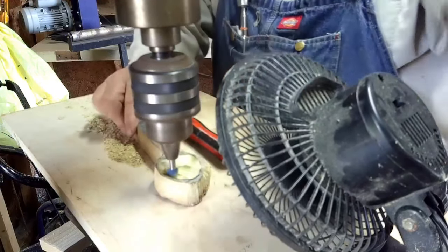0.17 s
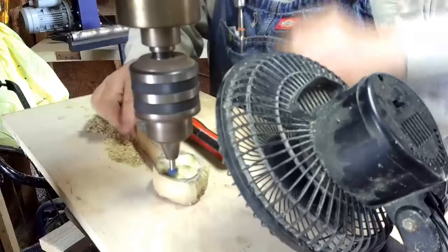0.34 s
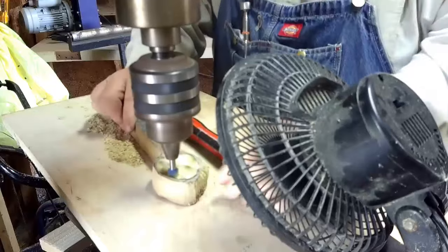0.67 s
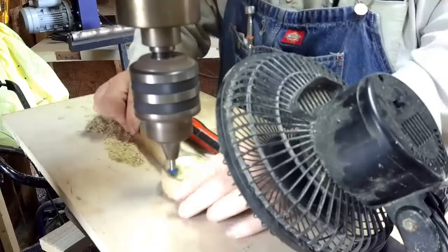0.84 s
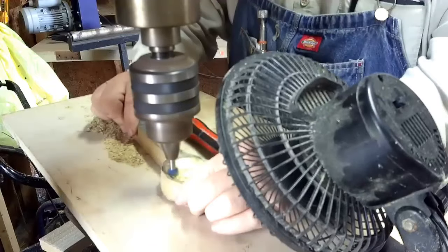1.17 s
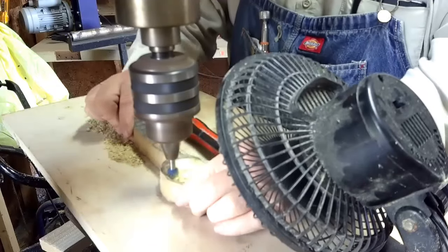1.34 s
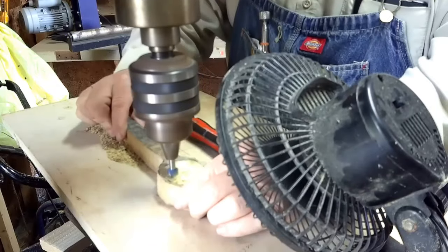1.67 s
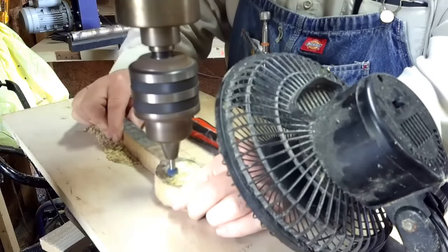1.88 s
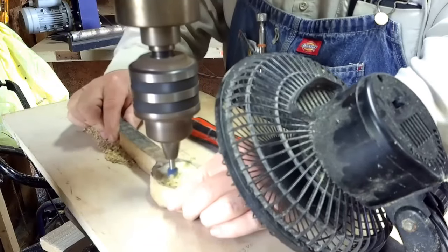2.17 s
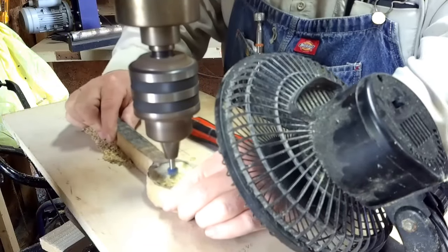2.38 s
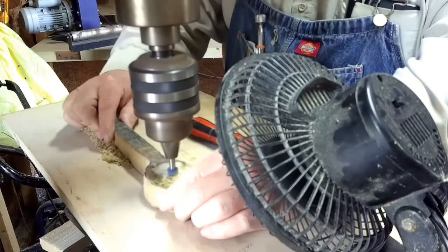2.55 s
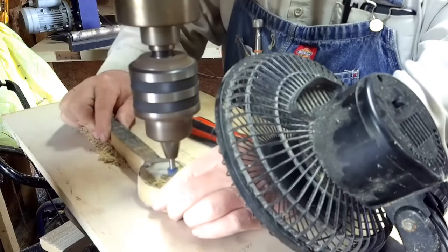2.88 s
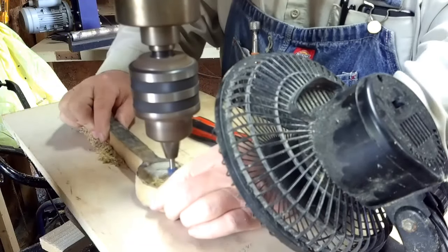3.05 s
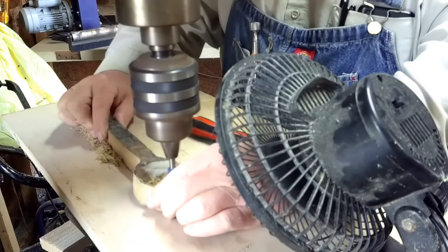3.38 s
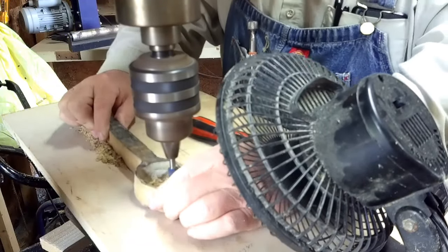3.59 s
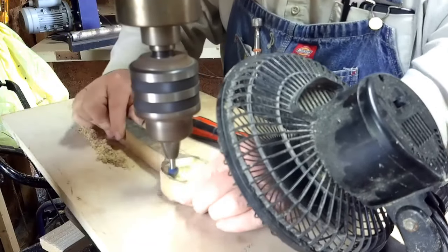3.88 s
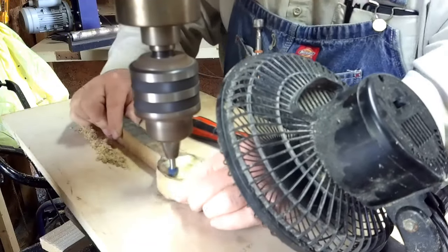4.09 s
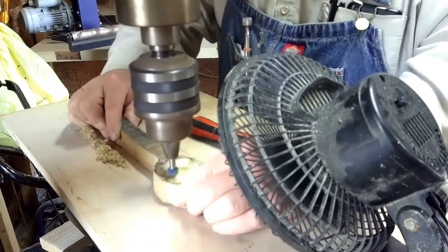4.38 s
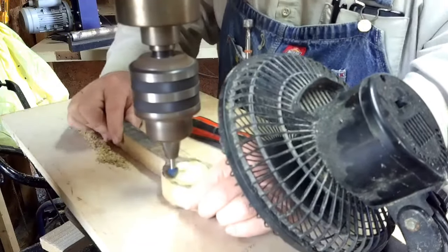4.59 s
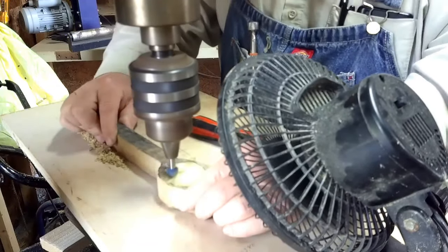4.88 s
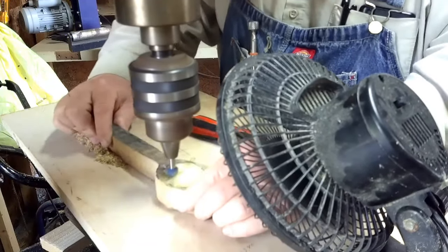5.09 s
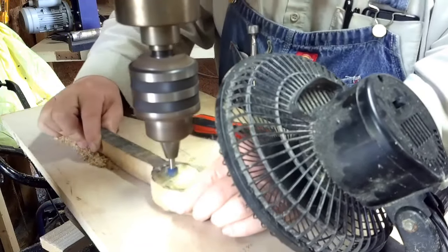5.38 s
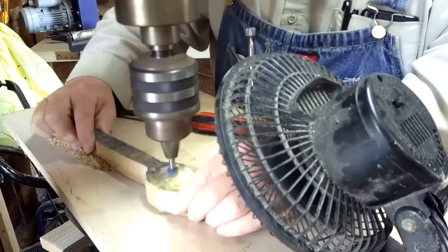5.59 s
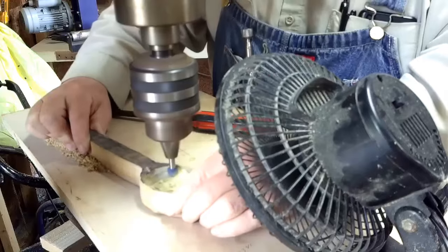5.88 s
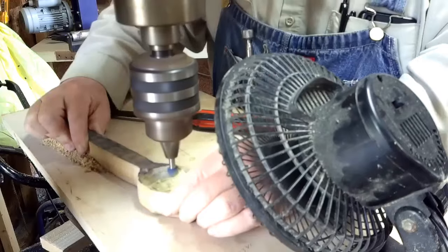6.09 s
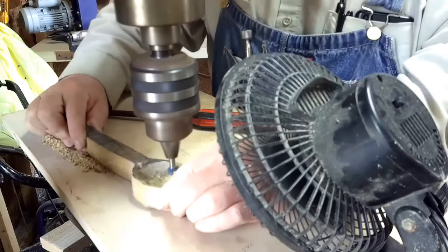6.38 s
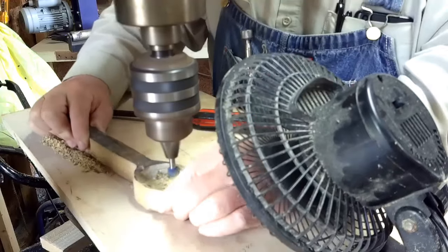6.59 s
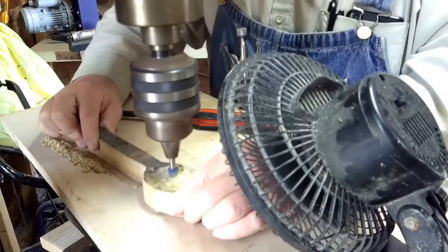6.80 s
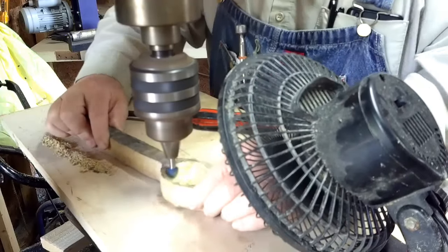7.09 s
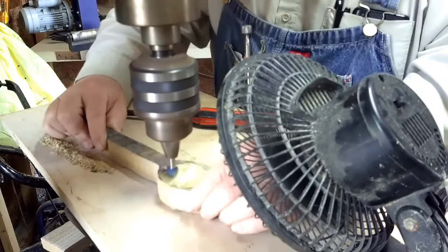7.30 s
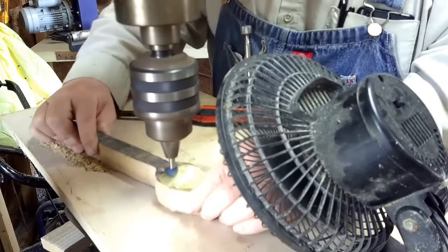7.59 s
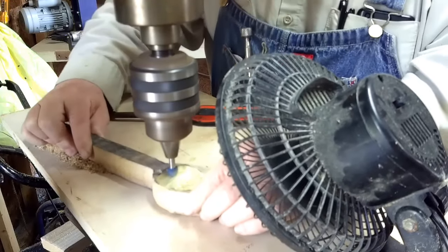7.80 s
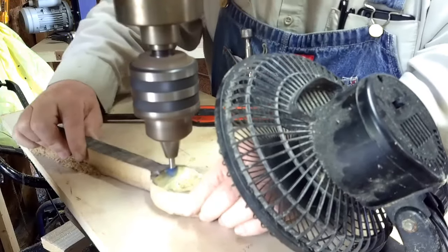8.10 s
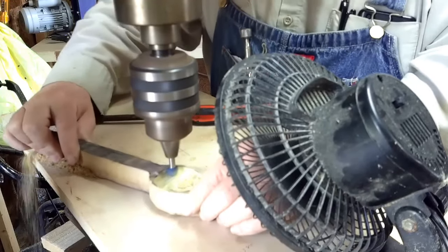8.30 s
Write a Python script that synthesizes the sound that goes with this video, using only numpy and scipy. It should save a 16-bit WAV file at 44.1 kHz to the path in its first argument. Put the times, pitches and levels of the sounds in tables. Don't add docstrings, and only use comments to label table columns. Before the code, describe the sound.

A spinning carving burr first touches wood lightly, then pushes in with a loud, clipped grinding roar, sharp bright snags and a buzzing mains hum. A tiny gap cuts it off. A pop starts a much faster version: thin motor whine, gritty treble hiss, singing wood, thin squeals and tearing puffs coming and going. Dry, close workshop pickup, slightly grainy treble, ending while still running.

```python
import sys
import numpy as np
from scipy import signal
from scipy.fft import rfft, irfft, next_fast_len
from scipy.io import wavfile
from scipy.ndimage import uniform_filter1d

SR = 44100
rng = np.random.default_rng(int(sys.argv[2]) if len(sys.argv) > 2 else 0)


def gain_from_db(level_db):
    decades = np.asarray(level_db, float) / 20
    return 10 ** decades


def pcm_store(signal):
    levels = np.round(np.clip(np.atleast_2d(signal), -1, 1) * 32767)
    wavfile.write(sys.argv[1], SR, levels.astype(np.int16).T)


N = 372644
T = np.arange(N) / SR

SLOW_END_S, FAST_START_S = 0.8016, 0.8216
MAINS_HZ = 120
SPINDLE_HZ, LOADED_HZ = 197.5, 197.4
SQUEAL_REST_DB = -42.5

# t/s, depth of bite/dB, shake of the table/dB
FEED_SLOW = [
    (0.0, -48, -14.5),
    (0.11, -20, -12),
    (0.15, -29, -14.5),
    (0.28, -28, -14),
    (0.355, -14.5, -10.5),
    (0.51, -9, -8),
    (0.65, -15, -13),
    (0.78, -14, -8.5),
    (0.8, -19, -10),
]
# t/s, peak level/dB, ring f/Hz
SNAGS = [
    (0.052, -5, 4760),
    (0.102, -10, 3440),
    (0.192, -9, 3390),
    (0.3082, -15, 2650),
    (0.4494, -2, 2800),
    (0.4958, 7.5, 4500),
    (0.574, -7, 4500),
    (0.626, 2.5, 3600),
    (0.74, -4, 3340),
]
# t/s, peak level/dB
TICKS = [(0.0513, -37), (0.0812, -30), (0.1027, -28), (0.1945, -32), (0.2628, -25), (0.3112, -30),
         (0.3681, -19), (0.397, -23), (0.4484, -15), (0.4958, -11), (0.7018, -22), (0.7397, -23)]
# f/Hz, level/dB per Hz
DUST = [(880, -32), (1500, -19), (2490, -8.5), (3480, -4.5), (4120, -9.5), (4590, -1), (6240, -17),
        (8240, -23), (10000, -40), (16000, -48)]
# f/Hz, width/Hz, level/dB
BITE = [(2160, 140, -3), (2750, 36, 6.5), (3557, 63, 4.5), (4420, 110, -4.5)]
# order, level/dB
HUM = [(1, -33), (4, -33), (5, -33), (6, -30)]
# start t/s, end t/s, order, level/dB
DRONES = [
    (-.04, .06, 2, -22.5),
    (.05, .14, 2, -12.5),
    (.16, .29, 2, -13),
    (.3, .46, 2, -18),
    (.07, .19, 3, -18.5),
    (.2, .3, 3, -12.5),
    (.34, .45, 3, -18.5),
    (.57, .63, 3, -18),
    (.74, .81, 3, -14.5),
]
# order, level/dB
DRONE_REST = [(2, -28), (3, -27)]
# f/Hz, level/dB per Hz
RUMBLE = [(18, -81), (60, -52), (110, -33), (200, -21), (260, -13), (400, -8), (660, -9.5), (900, -8),
          (1150, -9), (1900, -17), (3400, -16), (5000, -19), (6200, -30), (13000, -100)]
# f/Hz, width/Hz, level/dB
CASTING = [(268.6, 25, 7), (452, 76, -2), (610, 39, -5), (755, 40, -1), (860, 70, 0), (890, 56, 1),
           (966, 69, -1.5), (1204, 50, -7), (1304, 35, -8), (1690, 44, -2)]

# t/s, feed pressure/dB, fine dust/dB
FEED = [(0.82, -25, -27), (1.3, -24, -21.5), (2.0, -24.5, -26.5), (2.32, -26.5, -21.5), (2.7, -27.5, -22),
        (3.45, -25.5, -21.5), (3.52, -30.5, -22.5), (4.41, -31, -23), (4.47, -25.5, -22), (5.25, -27, -24),
        (5.9, -25, -21.5), (6.32, -29, -22), (6.37, -26.5, -23), (7.0, -30, -23.5), (7.05, -26, -29),
        (7.3, -27.5, -24), (7.9, -30, -27), (8.45, -28.5, -26)]
# f/Hz, level/dB per Hz
CHIPS = [(2350, -12), (4000, -2.5), (4740, 1), (5160, -2.5), (8000, -3), (11000, 7), (13100, 5),
         (13700, -1), (15800, 1)]
# t/s, peak level/dB, centre f/Hz, length/s
DIGS = [(1.924, -10, 5730, 0.0099), (3.309, -11, 5910, 0.018), (3.428, -14, 7400, 0.019),
        (3.718, -9.5, 8000, 0.05), (3.85, -12, 7660, 0.031), (3.915, -2.5, 9400, 0.0094),
        (4.111, -14, 9800, 0.023), (4.386, -17, 5760, 0.021), (4.447, -7.5, 7540, 0.014),
        (6.03, -12, 9060, 0.015), (6.395, -5.5, 5500, 0.025), (6.483, -7.5, 7600, 0.015),
        (6.866, -7.5, 8220, 0.027), (7.028, -10.5, 8930, 0.037)]
# start t/s, end t/s, f/Hz,
# width/Hz, level/dB
SINGING = [(0.816, .87, 10400, 6700, -20.5), (6.203, 6.29, 5090, 25, -40), (3.316, 3.34, 8000, 900, -24),
           (1.0, 1.88, 5800, 40, -40), (1.847, 2.18, 6000, 170, -37), (1.65, 2.15, 1152, 15, -40),
           (1.806, 2.176, 758, 13, -39.5), (1.679, 2.17, 1943, 63, -29.5), (3.13, 3.2, 5490, 60, -33),
           (3.138, 3.3, 6675, 40, -32), (3.2, 3.28, 5900, 40, -34), (3.36, 3.5, 7500, 560, -27.5),
           (3.5, 4.35, 9194, 20, -44), (4.606, 5.0, 4850, 29, -42), (4.715, 5.3, 745, 19, -52),
           (7.2, 7.5, 745, 19, -48), (3.352, 3.5, 7070, 40, -34), (3.36, 3.46, 6600, 40, -29),
           (3.39, 3.5, 7900, 60, -32), (3.29, 3.39, 5900, 30, -33), (5.112, 5.5, 1910, 63, -31.5),
           (5.443, 6.023, 6250, 47, -37), (5.97, 6.0, 9500, 1500, -24), (6.025, 6.05, 10500, 1800, -23),
           (6.09, 6.16, 10000, 1700, -25), (6.196, 6.29, 5490, 32, -31), (6.2, 6.28, 5885, 50, -31),
           (6.498, 6.576, 7500, 550, -26.5), (7.015, 7.122, 1950, 81, -27), (7.15, 7.382, 8500, 200, -35),
           (7.98, 8.5, 2780, 52, -29)]
# start t/s, end t/s, mode, level/dB
SQUEALS = [
    (.9, 2.8, 1, -58),
    (2.9, 3.6, 1, -31),
    (4.35, 4.9, 1, -48),
    (5.2, 5.7, 1, -36),
    (5.55, 6.5, 1, -31),
]
# f/Hz, level/dB per Hz
MACHINE = [(18, -54), (330, -32.5), (520, -22.5), (670, -27), (760, -16.5), (830, -25), (945, -19),
           (1720, -13.5), (2490, -11.5), (3320, -5), (4090, -13), (6720, -26), (10200, -16.5),
           (15500, -17.5)]
# f/Hz, width/Hz, level/dB
RESONANCES = [(904, 45, -1.5), (1050, 87, 3), (1375, 73, 5.5), (1555, 270, -5), (1722, 38, 3.5), (1946, 160, -4),
              (2326, 180, -6), (2694, 73, -1), (2780, 65, -1), (2940, 44, -12), (3230, 310, -6), (3435, 27, -5),
              (3694, 150, -5), (4750, 170, -2),
              (5490, 100, 0), (5900, 58, 4.5), (6410, 74, 4.5), (6670, 50, 3), (9860, 92, -0.5),
         (10300, 170, -1.5), (12800, 150, -4)]
# order, level/dB
SPINDLE = [(8, -41), (11, -45), (14, -45), (20, -46)]
# start t/s, end t/s, order, level/dB
LEANS = [(0.95, 1.72, 2, -49), (4.45, 4.68, 2, -50), (5.2, 5.8, 2, -54.5), (5.8, 6.22, 2, -49.5),
         (7.3, 8.6, 2, -51.5), (.8, 1.65, 4, -46), (1.9, 3.1, 4, -47), (2.65, 3.5, 4, -45),
         (4.45, 5.0, 4, -43), (5.55, 6.27, 4, -43), (6.3, 7.4, 4, -45), (7.9, 8.6, 4, -52),
         (1.6, 2.1, 6, -43), (6.3, 6.9, 6, -48), (7.1, 6.9, 4, -53), (3.2, 3.4, 4, -50), (3.2, 3.7, 2, -55),
         (6.75, 7.2, 2, -55), (2.4, 3.35, 6, -42), (3.44, 3.65, 6, -33), (5.3, 6.25, 6, -43),
         (6.9, 7.2, 6, -42), (7.25, 7.75, 6, -37.5),
         (1.25, 1.5, 7, -35), (.85, 1.25, 7, -35.5), (1.55, 2.25, 7, -30.5), (2.2, 2.75, 7, -26.5),
           (2.696, 3.39, 7, -29.5), (3.4, 3.9, 7, -35.5), (4.55, 4.95, 7, -29), (4.898, 6.25, 7, -32),
           (6.8, 6.94, 7, -26.5), (7.002, 7.264, 7, -27), (7.218, 8.094, 7, -35.5), (1.7, 2.12, 10, -33.5),
           (2.1, 3.4, 10, -40), (4.65, 4.9, 10, -37), (5.12, 6.2, 10, -40), (6.996, 7.22, 10, -29),
           (7.296, 7.6, 10, -35), (7.5, 8.6, 10, -30.5), (1.92, 2.3, 12, -33), (2.3, 2.75, 12, -35.5),
           (4.65, 4.88, 12, -36), (5.85, 6.15, 12, -37), (7.75, 8.6, 12, -38), (1.3, 1.5, 24, -36),
           (2.0, 2.7, 24, -42), (6.7, 6.95, 24, -40), (4.62, 5.0, 24, -31), (7.3, 7.8, 24, -39)]
# order, level/dB
LEAN_REST = [(2, -60.5), (4, -59), (6, -45), (7, -46), (10, -51), (12, -43), (24, -53)]
# t/s, rotor whine f/Hz
ROTOR = [(.82, 868.4), (1.75, 867.1), (4.25, 868.8), (4.9, 868), (6.0, 867.8), (6.55, 868.8), (7.8, 867.5),
         (8.45, 867.6)]
# multiple, offset/Hz, level/dB
ROTOR_LINES = [(1, 0, -34.5), (1, 3.5, -43), (1, 13, -46), (.5, 0, -59)]
# f/Hz, level/dB, wavering/dB
WHINE = [(895, -31, 1), (1342, -39, 2), (447.5, -59, 1), (479, -61, 1), (953, -52, 2), (1035, -48, 2),
         (1005, -48, 2), (1092, -51, 2), (785, -57, 2), (843, -60, 2), (1737, -43, 2), (2836, -38, 2),
         (3197, -42, 2), (10311, -47, 2), (11195, -49, 2), (13045, -44, 2), (13813, -50, 2),
         (14743, -50, 2), (15665, -51, 2)]
# t/s, peak level/dB
KNOCKS = [(0.987, -44), (1.304, -47), (1.396, -47), (1.568, -44), (2.098, -40), (2.166, -48), (2.532, -49),
          (2.986, -42), (3.253, -44), (3.724, -45), (3.9, -37), (3.985, -51), (4.104, -49), (4.396, -46),
          (5.05, -52), (5.344, -43), (5.779, -46), (5.98, -44), (6.388, -49), (6.535, -39), (6.73, -47),
          (7.018, -38), (7.155, -44), (7.233, -51), (7.306, -46), (7.575, -46), (7.678, -49), (7.933, -45),
          (8.124, -49), (8.31, -45)]
# middle t/s, low f/Hz, high f/Hz, level/dB
SLIPS = [(1.126, 7500, 9900, -30), (1.265, 6100, 7700, -32), (1.311, 4200, 5400, -32.5),
         (3.192, 4100, 5900, -35), (4.702, 8200, 9800, -35), (4.702, 14400, 16000, -35),
         (4.795, 9500, 12000, -35), (7.744, 9600, 11300, -32)]
STARVED_HZ = [6250, 7700, 8850]


def evened(x):
    return x / np.sqrt(np.mean(x ** 2) + 1e-20)


def read(points, hz):
    f, db = np.transpose(points)
    return np.interp(np.log(hz + 1), np.log(f + 1), db)


def curves(rows):
    s, *columns = np.transpose(rows)
    return [np.interp(T, s, c) for c in columns]


def bump(at, width):
    return np.exp(-((T - at) / width) ** 2)


def drift(rate_hz):
    pole = np.exp(-2 * np.pi * rate_hz / SR)
    motion = signal.lfilter([1], [1, -2 * pole, pole ** 2], rng.standard_normal(N + SR))
    return evened(motion[SR:])


def swells(rows, which, rest_db, edge_s):
    t = T[::64]
    power = np.full(len(t), gain_from_db(rest_db) ** 2)
    for start, end, voice, db in rows:
        if round(voice) == round(which):
            plateau = np.clip(np.minimum(t - start, end - t) / edge_s, 0, 1)
            power += (gain_from_db(db) * plateau) ** 2
    return np.interp(T, t, 10 * np.log10(power))


def humps_db(modes, hz, floor_db):
    power = sum(gain_from_db(db) ** 2 / (1 + (2 * (hz - f) / width) ** 2) ** 2 for f, width, db in modes)
    return 10 * np.log10(power + gain_from_db(floor_db) ** 2)


def noise(colour_db, patchy_db, size):
    frames, hz = 4 * N // size + 8, np.fft.rfftfreq(size, 1 / SR)
    a, b, patches = rng.standard_normal((frames, len(hz), 3)).T
    patches = uniform_filter1d(patches, size // 100, 0)
    patches = evened(uniform_filter1d(patches, 10000 // size, 1))
    z = (a + 1j * b) * gain_from_db(colour_db(hz)[:, None] + patchy_db * patches)
    return evened(signal.istft(z, nperseg=size, noverlap=3 * size // 4)[1][:N])


def rippled(x, ripple_db, width_hz):
    size = next_fast_len(N)
    jags = uniform_filter1d(rng.standard_normal(size // 2 + 1), size=round(width_hz * size / SR))
    out = irfft(rfft(x, size) * gain_from_db(ripple_db * evened(jags)), size)[:N]
    return evened(out) * np.std(x)


def resonate(x, hz, width):
    turn = np.exp(2j * np.pi * np.cumsum(hz * np.ones(len(x))) / SR)
    r = np.exp(-np.pi * width / SR)
    return 2 * (turn * signal.lfilter([1 - r], [1, -r], x / turn)).real


def tone(hz, db, waver_db, rate_hz):
    turns = np.cumsum(hz * np.ones(N)) / SR + rng.random()
    return np.sqrt(2) * gain_from_db(db + waver_db * drift(rate_hz)) * np.sin(2 * np.pi * turns)


def whistle(hz, width, size):
    a, b = rng.standard_normal((size + 4000, 2)).T
    r = np.exp(-np.pi * width / SR)
    slow = signal.lfilter([1], [1, -2 * r, r ** 2], a + 1j * b)[4000:]
    slow = slow / abs(slow) ** (0.8 / (1 + (width / 400) ** 2))
    return evened((slow * np.exp(2j * np.pi * hz * np.arange(len(slow)) / SR)).real)


def bursts(rows, width, rise):
    out = np.zeros(N)
    t = np.arange(0, 0.12, 1 / SR)
    for s, db, hz, length in rows:
        puff = evened(resonate(resonate(rng.standard_normal(len(t)), hz, width), hz, width))
        shape = (1 - np.exp(-t / rise)) * np.exp(-(t / length) ** 2)
        out[round(s * SR):][:len(t)] += gain_from_db(db) * puff * shape
    return out


def burr(cut_db, dust_db, hollow_hz):
    strikes = 2 * LOADED_HZ * T
    ticks = evened(np.diff(np.floor(strikes), prepend=0) * gain_from_db(3.1 * drift(60)))
    gate = 1.8 + np.exp(-(strikes % 1) / 0.3)
    chips = gate * noise(lambda hz: read(CHIPS, hz) - 30 / (1 + (10500 / (hz + 1)) ** 16), 2.1, size=512)
    dust = gate * noise(lambda hz: read(CHIPS, hz) - 30 / (1 + (hz / 9500) ** 16), 1.2, size=512)
    struck = 0.5 * ticks + gate * rng.standard_normal(N)
    hollow = resonate(resonate(struck, hollow_hz, 2200), hollow_hz, 2200)
    cut = gain_from_db(cut_db) * rippled(evened(chips), 2.5, 50) + gain_from_db(cut_db - 8.5) * evened(hollow)
    cut += gain_from_db(dust_db - 2.5) * rippled(evened(dust), 2.5, 50)
    small = signal.butter(2, 2000, "high", fs=SR)
    return signal.lfilter(*small, cut)


def slow_burr(bite_db):
    throb = 1 + 0.3 * np.cos(2 * np.pi * MAINS_HZ * T)
    bite = throb * noise(lambda hz: read(DUST, hz) + 0.5 * humps_db(BITE, hz, -16), 0.7, size=512)
    dust = throb * noise(lambda hz: read(DUST, hz) - 40 / (1 + (hz / 6500) ** 12), 4.3, size=512)
    dust_db = -33.5 + 0.26 * (bite_db - bite_db.max())
    cut = gain_from_db(bite_db + 0.75 * drift(37)) * bite + gain_from_db(dust_db + 1.7 * drift(15)) * dust
    cut += bursts([(s, db - 6.5, hz, 0.007) for s, db, hz in SNAGS], 1160, 0.0006)
    cut += bursts([(s, db - 11, 10500, 0.006) for s, db in TICKS], 6000, 0.00065)
    shudder = whistle(170, 66, size=N)
    return cut + gain_from_db(bite_db - 22) * shudder


def slow_motor(bite_db):
    load_db = 0.39 * (bite_db - bite_db.max())
    hum = sum(tone(k * MAINS_HZ, db + load_db, 1.6, 7.1) for k, db in HUM)
    for k, db in DRONE_REST:
        hum += tone(round(k) * MAINS_HZ, swells(DRONES, k, db, 0.022), 0.9, 27)
    return hum


def castings(rumble_db):
    rumble = noise(lambda hz: read(RUMBLE, hz) + 0.7 * humps_db(CASTING, hz, -14), 0.79, size=2048)
    return gain_from_db(rumble_db + 0.63 + 0.84 * drift(34)) * rumble


def digs():
    torn = bursts([(s, db - 13.5, hz, length) for s, db, hz, length in DIGS], 2600, 0.0014)
    jolts = bursts([(s, db - 12.5, 3100, length) for s, db, hz, length in DIGS], 2160, 0.0013)
    return torn + jolts


def singing():
    out = np.zeros(N)
    for start, end, hz, width, db in SINGING:
        now = np.flatnonzero((T >= start) & (T < end))
        out[now] += gain_from_db(db) * whistle(hz, width, size=len(now)) * signal.windows.tukey(len(now), 0.5)
    return out


def machine(level_db):
    colour = lambda hz: read(MACHINE, hz) + 0.76 * humps_db(RESONANCES, hz, -11.5)
    body = gain_from_db(level_db + 2.5) * rippled(noise(colour, 0.42, size=2048), 3.5, 4)
    orders = sum(tone(k * SPINDLE_HZ, db, 2.1, 5.5) for k, db in SPINDLE)
    for k, db in LEAN_REST:
        orders += tone(round(k) * SPINDLE_HZ, swells(LEANS, k, db, 0.075), 1.2, 8.5)
    squeal_db = swells(SQUEALS, 1, SQUEAL_REST_DB, 0.19) + 3 * drift(14)
    return body + orders + gain_from_db(squeal_db) * whistle(7460, 150, size=N)


def motor_whine():
    rotor_hz = curves(ROTOR)[0]
    whine = sum(tone(k * rotor_hz + hz, db, 0.25, 6.3) for k, hz, db in ROTOR_LINES)
    whine += sum(tone(*line, 5.6) for line in WHINE)
    rise_db = -12 * np.exp(-np.maximum(T - FAST_START_S, 0) / 0.065)
    return gain_from_db(rise_db) * whine


def table():
    lumps = noise(lambda hz: -45 / (1 + (330 / (hz + 1)) ** 6), 1.5, size=1024)
    knocks = bursts([(s, db - 1.5, 150, 0.011) for s, db in KNOCKS], 350, 0.003)
    return lumps * gain_from_db(-64 + 4.7 * drift(24)) + knocks


def slips():
    out, hz = np.zeros(N), np.fft.rfftfreq(2048, 1 / SR)
    for s, low_hz, high_hz, db in SLIPS:
        band = irfft(rfft(rng.standard_normal(2048)) * (hz > low_hz) * (hz < high_hz))
        out[round(s * SR) - 1024:][:2048] += gain_from_db(db) * evened(band) * signal.windows.tukey(2048, 0.6)
    return out


def natural_speed():
    bite_db, rumble_db = curves(FEED_SLOW)
    return slow_burr(bite_db) + slow_motor(bite_db) + castings(rumble_db)


def dig_depth_db():
    depth_db = np.zeros(N)
    for s, db, hz, length in DIGS:
        deeper = 5 * bump(s + 0.97 * length, 0.45 * length)
        bounce = -2.5 * bump(s + 0.031, 0.027)
        depth_db += gain_from_db(db + 12) * (deeper + bounce)
    return depth_db


def gain_settling_db():
    after, fall_s = T - 0.855, 0.027
    fallen = np.clip(after / fall_s, 0, 1)
    return 1.5 * (1 - fallen) - 8 * fallen * np.exp(-np.maximum(after - fall_s, 0) / 0.026)


def fast_play():
    feed_db, dust_db = curves(FEED)
    dig_db, settle_db = dig_depth_db(), gain_settling_db()
    level_db = -21.5 + 0.055 * (feed_db - feed_db.mean()) + 0.25 * dig_db + 0.77 * settle_db
    level_db += 0.18 * drift(4.4)
    cut_db = feed_db + dig_db + 1.6 * settle_db + 1.1 * drift(7.8)
    dust_db = dust_db + settle_db + 0.4 * drift(5.2)
    steered = burr(cut_db, dust_db, hollow_hz=7500) + singing() + machine(level_db) + motor_whine()
    return steered * gain_from_db(0.81 * drift(24) + 0.55 * drift(194)) + digs() + table()


def starved(x, floor_db, edge_hz):
    hz, t, z = signal.stft(x, SR, nperseg=2048, noverlap=1024)
    bands = abs(np.pad(z, ((0, 1), (0, 0))).reshape(171, 6, -1) ** 2).mean(1).repeat(6, 0)
    luck = uniform_filter1d(rng.standard_normal((len(t), 171)), size=3, axis=0)
    luck = evened(luck).T.repeat(6, 0)
    often = 1.6 * sum(np.exp(-((hz[:, None] - f) / 120) ** 2) for f in STARVED_HZ)
    lost = (10 * np.log10(bands[:1025] + 1e-20) < floor_db) | (luck[:1025] + often > 1.3)
    z *= np.where(lost & (hz[:, None] > edge_hz), gain_from_db(-22), 1)
    return signal.istft(z, SR, nperseg=2048, noverlap=1024)[1][:N]


def scene():
    loud = natural_speed() * (T < FAST_START_S)
    overloaded = loud / (1 + np.abs(loud / 1.05) ** 5) ** (1 / 5)
    slow = starved(overloaded, -88, 5800) * np.clip((SLOW_END_S - T) / 0.003, 0, 1)
    fast = fast_play() * (T > FAST_START_S) * gain_from_db(5 * bump(FAST_START_S, 0.003))
    side = slips()
    return np.array([slow + fast + side, slow + fast - side])


def band_limit(x):
    return signal.sosfilt(signal.butter(12, 16230, fs=SR, output="sos"), x)


def record(dry):
    lowpass = signal.firwin(1501, 15740, window=("kaiser", 10), fs=SR)
    band = signal.oaconvolve(dry, lowpass[None], "same")
    return band_limit(np.clip(band, -1, 1))


dry = scene()
out = record(dry)
pcm_store(out)
```